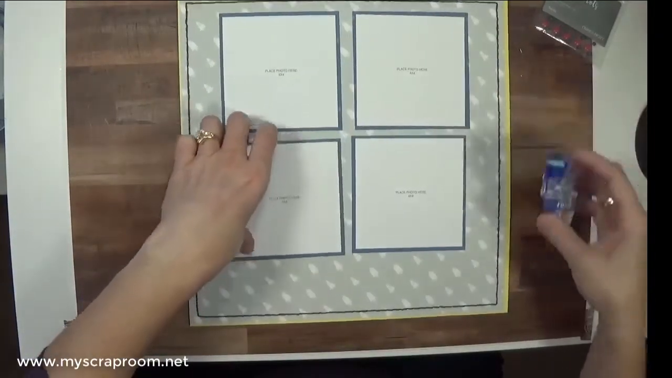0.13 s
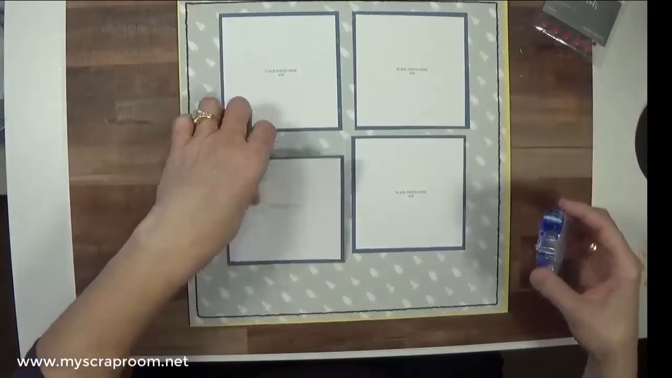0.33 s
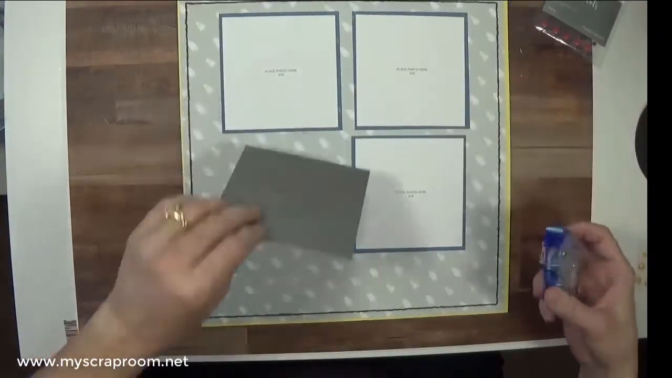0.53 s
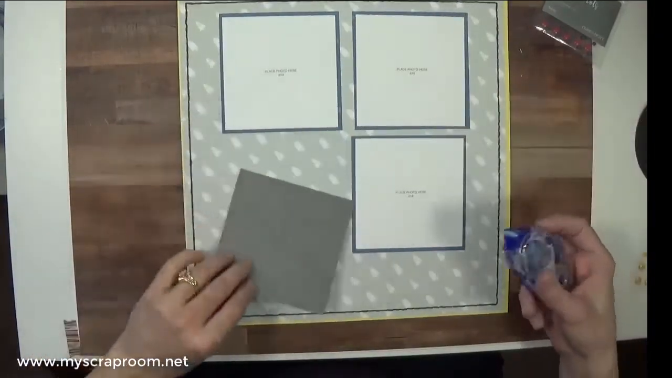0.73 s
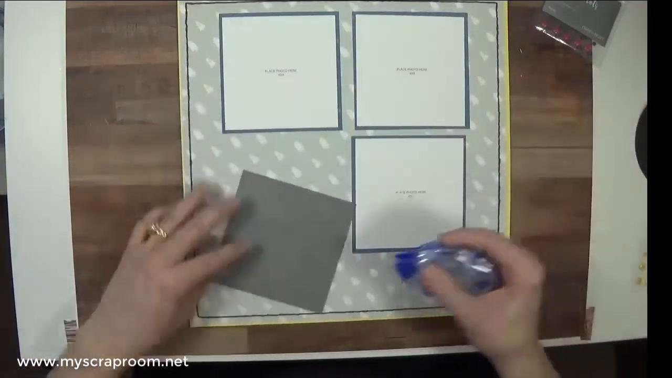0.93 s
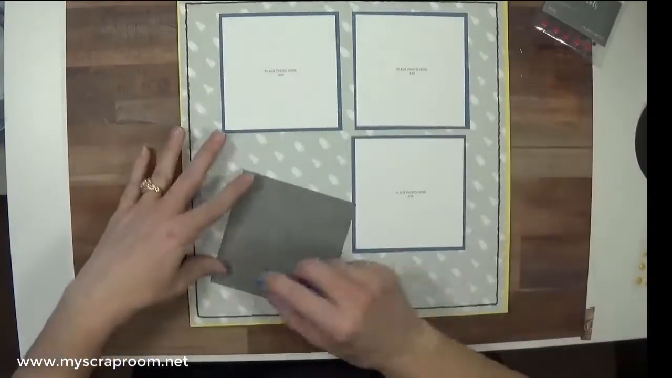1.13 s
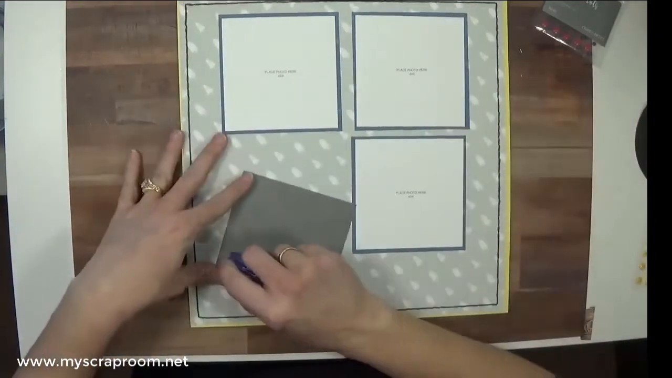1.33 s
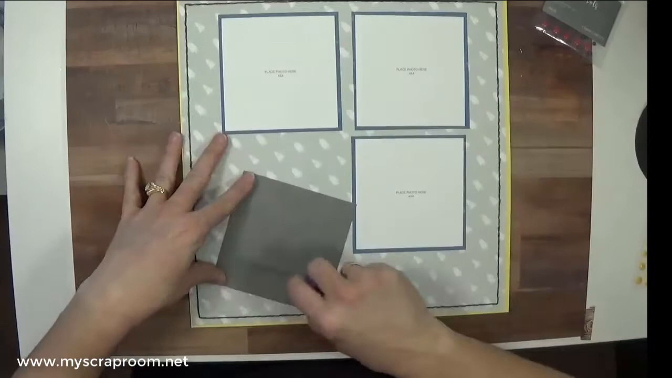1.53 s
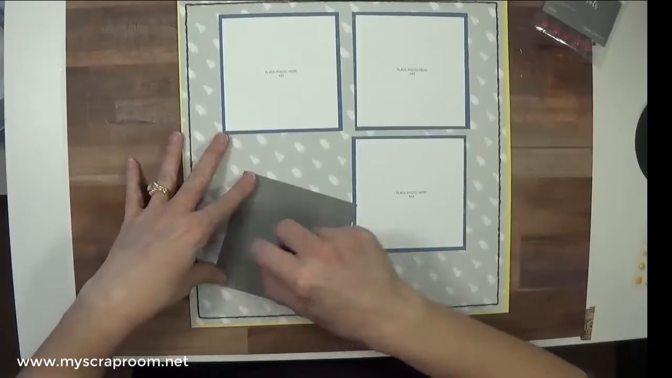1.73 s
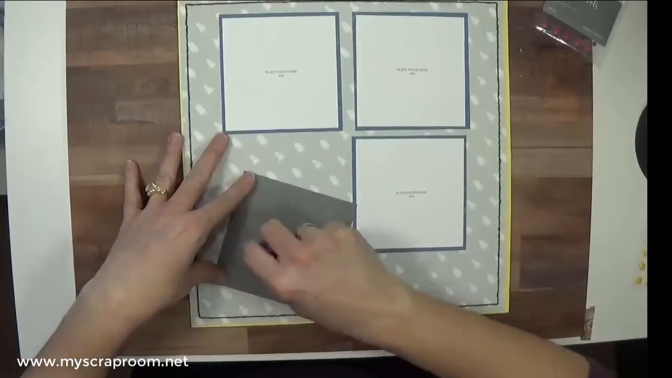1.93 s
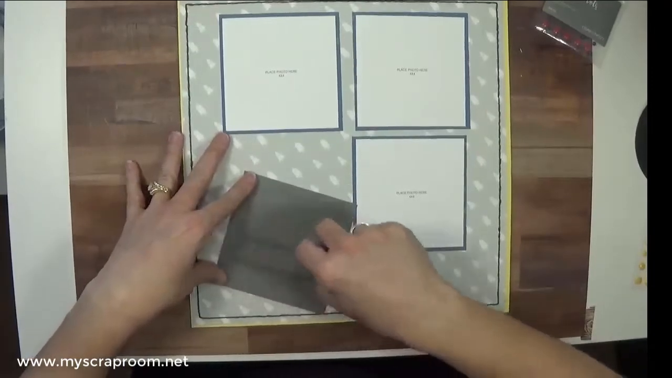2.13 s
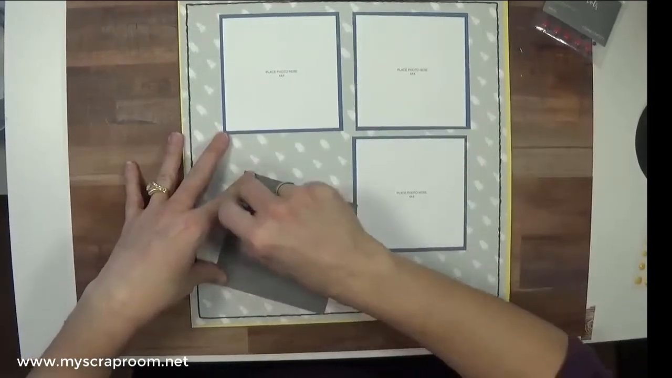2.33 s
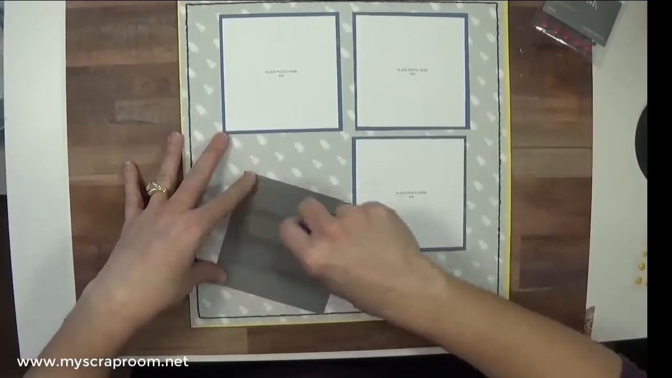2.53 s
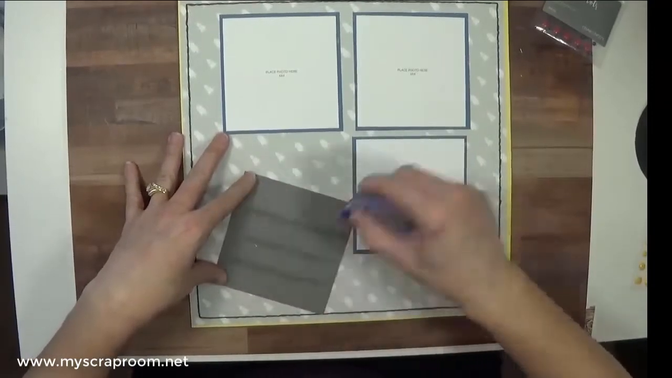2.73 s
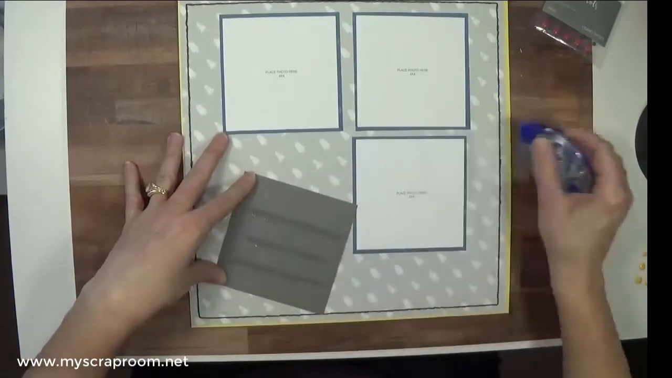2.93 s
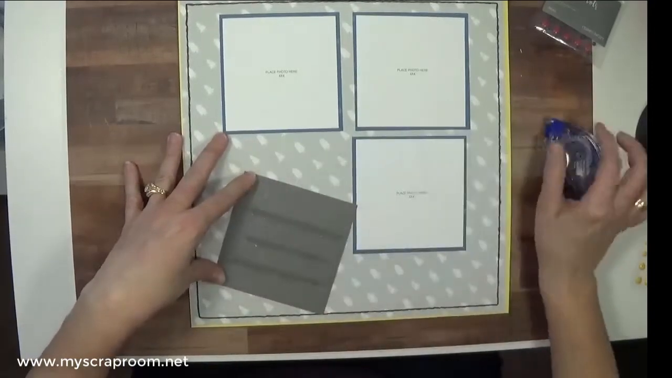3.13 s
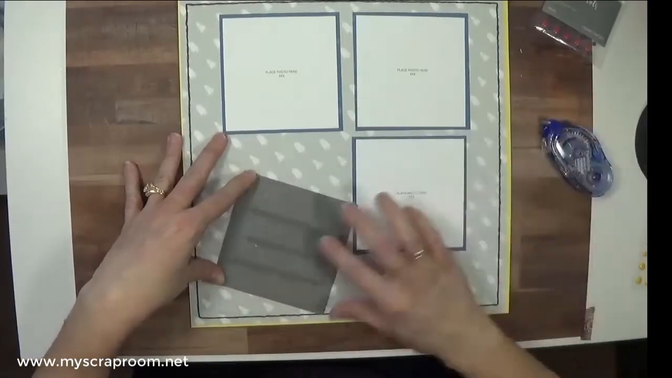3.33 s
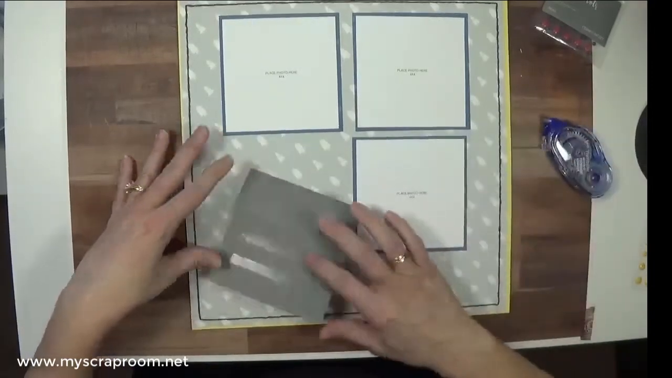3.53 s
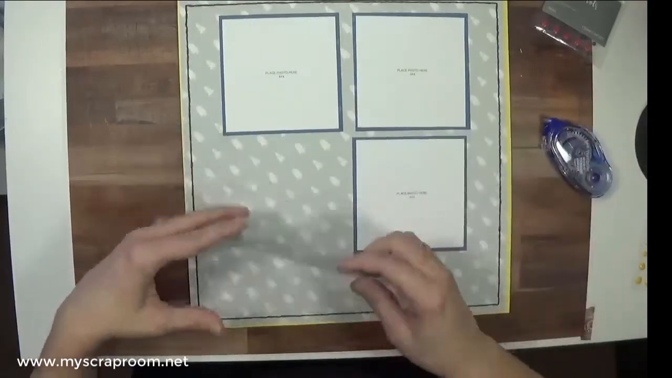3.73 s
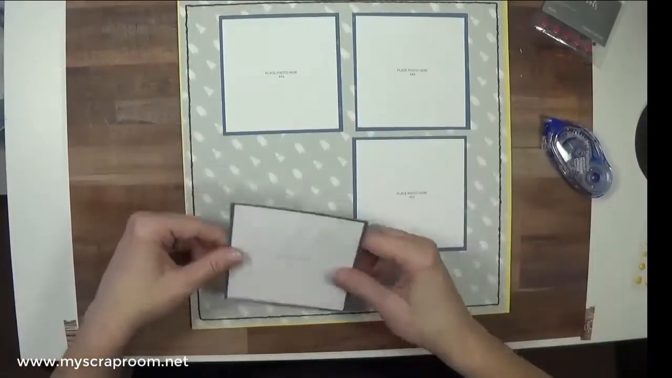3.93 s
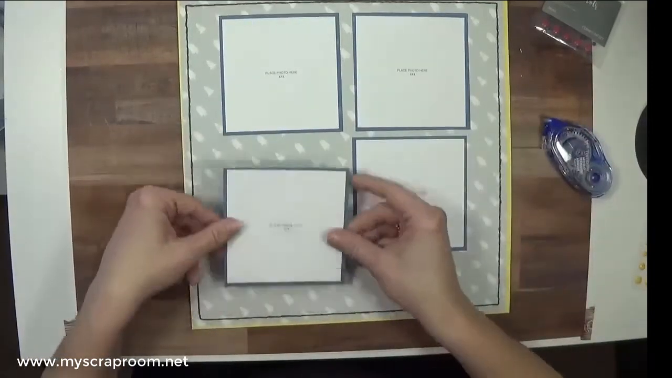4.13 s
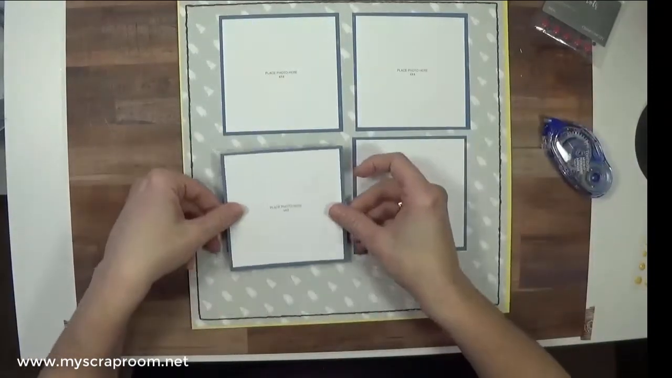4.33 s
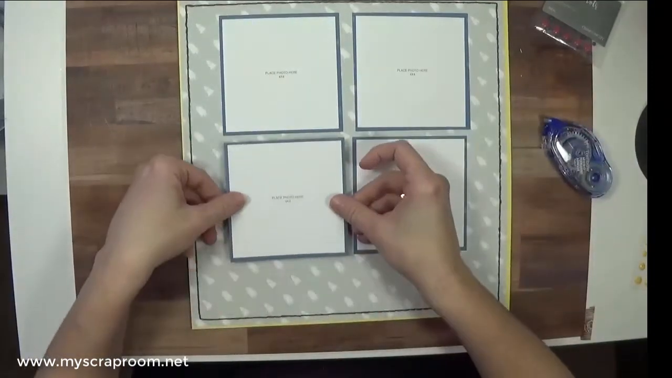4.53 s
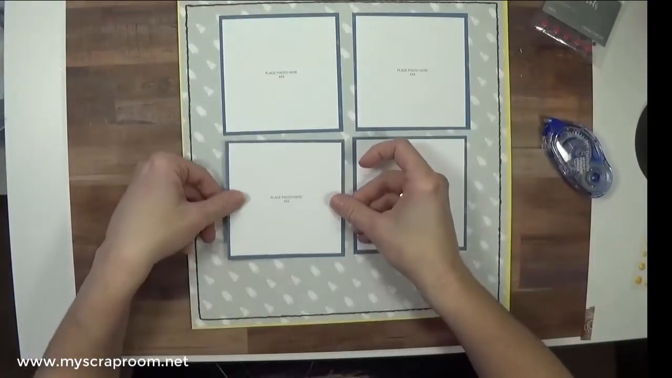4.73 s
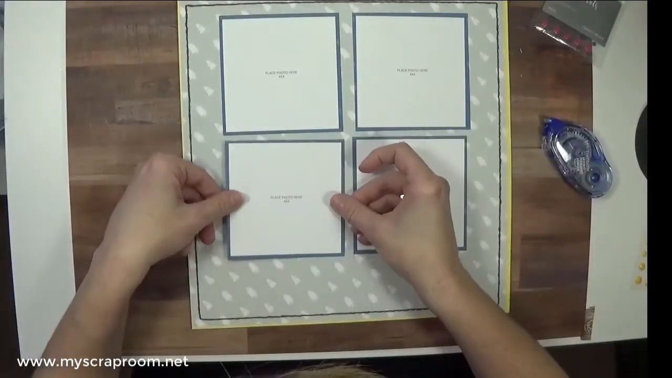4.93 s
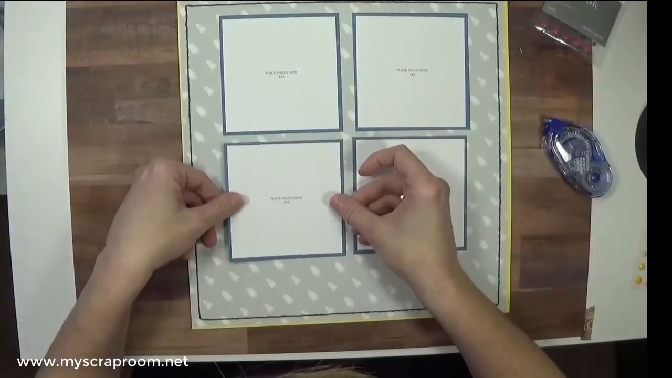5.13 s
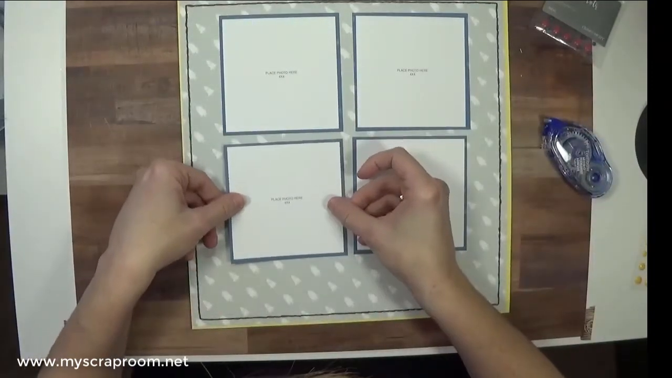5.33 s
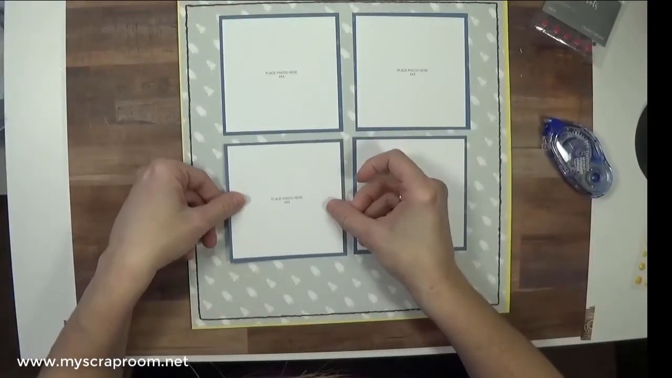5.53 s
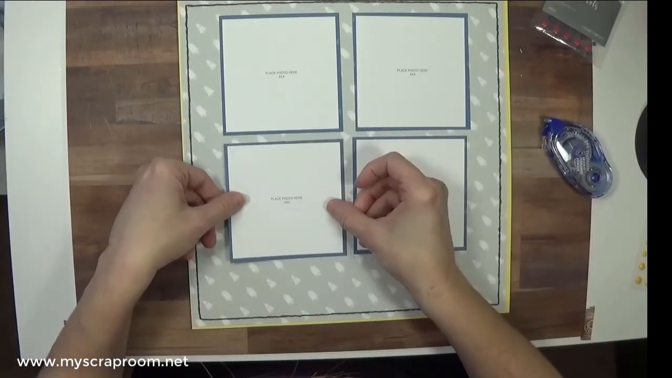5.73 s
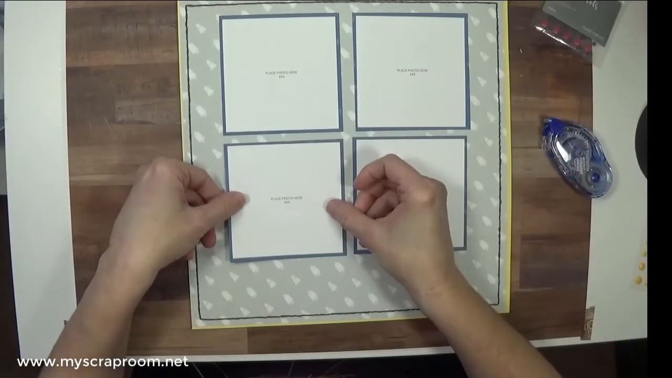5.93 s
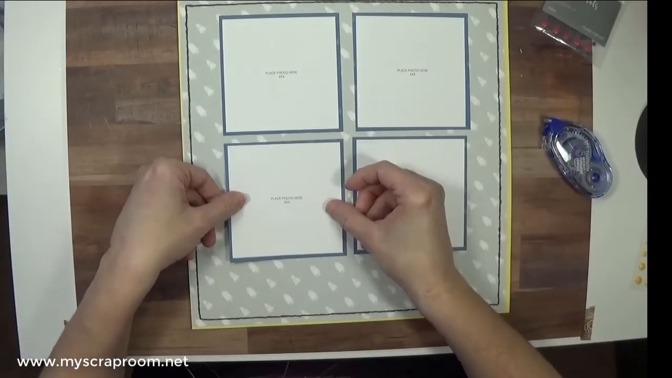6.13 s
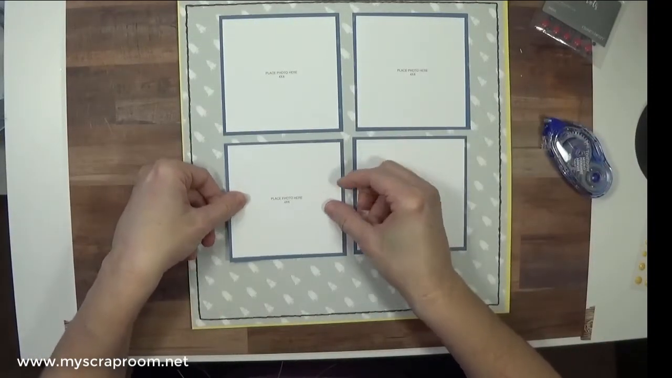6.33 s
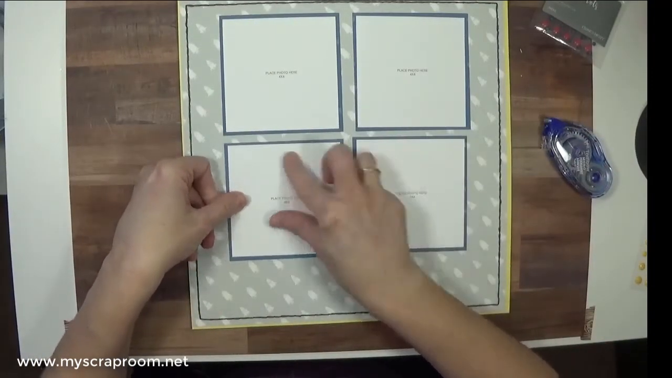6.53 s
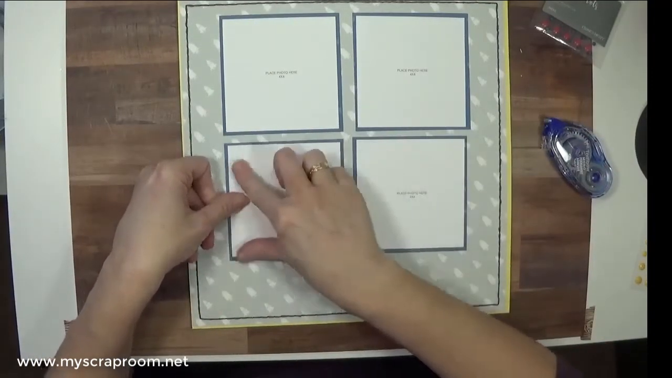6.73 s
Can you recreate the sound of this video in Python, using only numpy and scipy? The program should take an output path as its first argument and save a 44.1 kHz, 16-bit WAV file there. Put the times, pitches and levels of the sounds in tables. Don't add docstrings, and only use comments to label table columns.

```python
import sys
import numpy as np
from scipy import signal
from scipy.fft import rfft, irfft, next_fast_len
from scipy.io import wavfile
from scipy.ndimage import uniform_filter1d

SR = 44100
rng = np.random.default_rng(int(sys.argv[2]) if len(sys.argv) > 2 else 0)


def decibels_to_gain(level_db):
    exponent = np.asarray(level_db, float) / 20
    return 10 ** exponent


def unload_audio(sound):
    columns = np.transpose(np.atleast_2d(sound))
    steps = np.round(np.clip(columns, -1, 1) * 32767)
    wavfile.write(sys.argv[1], SR, steps.astype(np.int16))


N = 302967
TIME_S = np.arange(N) / SR

# mode_hz, width_hz, level_db
SHELL_MODES = [(1100, 220, -3.5), (1580, 220, 0.8), (1900, 200, -2), (2560, 250, -3), (2950, 300, -7),
               (4230, 300, -0.6), (5150, 400, -6), (6580, 350, -5), (8450, 450, -6)]
BODY_MODE, FREE_MODE, UPPER_MODE = 1, 5, 7


def pulls():
    # start_s, length_s, rasp_db, grip_s (time to take a firm grip)
    pull_rows = [
        (1.371, 0.27, -30, 0.02),
        (1.871, 0.27, -29.5, 0.0078),
        (2.384, 0.3, -28.5, 0.014),
    ]
    # time_s, teeth_passed (count)
    drawn_rows = [
        [(1.3824, 0), (1.3945, 1), (1.4147, 3), (1.4443, 7), (1.493, 16), (1.5302, 22), (1.5448, 24),
         (1.5791, 28), (1.6037, 30)],
        [(1.8808, 0), (1.888, 1), (1.9214, 4), (1.9479, 9), (2.0121, 21), (2.0529, 28), (2.0638, 29),
         (2.0717, 30), (2.0945, 32)],
        [(2.3909, 0), (2.4013, 1), (2.4287, 3), (2.4437, 5), (2.5251, 19), (2.577, 27), (2.5954, 30),
         (2.6262, 33), (2.649, 34)],
    ]
    shapes = [pull_shape(*row) for row in pull_rows]
    moving = gains(shapes, lambda r: 0 * r[:, 1]) > 0.5
    teeth = ratchet(drawn_rows)
    glue = peel(drawn_rows, moving)

    span = slice(int(1.3 * SR), int(1.3 * SR) + 65536)
    grip_db = hand_grip(span)
    low, high = np.zeros((2, N))
    low[span] = band(shell((teeth + glue)[span], grip_db, wash_db=-2), 500, 3300)
    high[span] = -band(shell((teeth + decibels_to_gain(-4) * glue)[span], grip_db, wash_db=1), 3300, 15000)
    low = low / np.std(low[moving])
    high = high / np.std(high[moving])
    rasp = low * gains(shapes, lambda r: r[:, 1]) + high * gains(shapes, lambda r: r[:, 2])
    drum = level(signal.fftconvolve(rng.standard_normal(N), thud(0))[:N])
    return np.array([rasp, drum * gains(shapes, lambda r: r[:, 3])])


def pull_shape(start_s, length_s, rasp_db, grip_s):
    slow_treble_db, fast_treble_db = 0.5, 6
    start_rumble_db, end_rumble_db = -19, -14.5
    effort_db, grip_db, lift_db, lift_s = 0.2, -10.5, -22.5, 0.039
    u = np.linspace(0, 1, num=60)
    effort = np.sin(np.pi * u) ** 2
    gripping = np.clip(1 - u * length_s / grip_s, 0, 1)
    lifting = np.clip(1 - (1 - u) * length_s / lift_s, 0, 1)
    rasp = rasp_db + effort_db * (effort - 1) + grip_db * gripping + lift_db * lifting
    treble = rasp + slow_treble_db + (fast_treble_db - slow_treble_db) * np.sqrt(effort)
    rumble = rasp + start_rumble_db + (end_rumble_db - start_rumble_db) * u
    return np.transpose([start_s + u * length_s, rasp, treble, rumble])


def ratchet(drawn_rows, jitter_ms=0.3, tooth_ms=1.35, scatter_db=2.5):
    tooth_s = []
    for rows in drawn_rows:
        when, count = np.transpose(rows)
        tooth_s.append(np.interp(np.arange(rows[-1][1] + 1), count, when))
    tooth_s = np.concatenate(tooth_s)
    jitter, strength = rng.standard_normal((2, len(tooth_s)))
    slaps = np.zeros(N)
    at = ((tooth_s + (jitter_ms * jitter - tooth_ms) / 1000) * SR).astype(int)
    slaps[at] = decibels_to_gain(scatter_db * strength)
    return level(np.abs(signal.fftconvolve(slaps, contact(np.ones(1000), tooth_ms))[:N]))


def peel(drawn_rows, moving, grain=1.2):
    slow_teeth = 70
    drawn = sum(np.interp(TIME_S, *np.transpose(rows)) for rows in drawn_rows)
    speed = np.maximum(uniform_filter1d(np.gradient(drawn) * SR, size=900), slow_teeth)
    return level(moving * decibels_to_gain(grain * walk(640)) * (speed / slow_teeth) ** 0.8)


def hand_grip(span):
    # time_s, balance_db (given to the lower mode, taken from the upper)
    thumb_rows = [(1.38, 6), (1.445, 5), (1.48, -3), (1.575, -5), (1.6, 4), (1.9, 4), (1.99, 3), (2.04, 1),
                  (2.1, 4), (2.42, 2), (2.47, -1), (2.52, 1), (2.58, -2), (2.66, 2)]
    grip_db = [2.4 * walk(14)[span] for _ in SHELL_MODES]
    thumb_db = np.interp(TIME_S[span], *np.transpose(thumb_rows))
    grip_db[FREE_MODE] = grip_db[FREE_MODE] / 2 + thumb_db
    grip_db[UPPER_MODE] = grip_db[UPPER_MODE] / 2 - thumb_db / 2
    grip_db[BODY_MODE] = grip_db[BODY_MODE] / 2 + 1
    return grip_db


def shell(force, grip_db, wash_db):
    # freq_hz, density_db (per Hz)
    wash_rows = [(300, -44.5), (700, -19), (1000, -7), (1700, -1), (2300, -2), (3500, -0.5), (5500, -4),
                 (8000, 0), (11000, -3.5)]
    noise = force * rng.standard_normal((len(SHELL_MODES) + 1, len(force)))
    modes = 0
    for k, (hz, width_hz, db) in enumerate(SHELL_MODES):
        modes = modes + decibels_to_gain(db + grip_db[k]) * resonate(noise[k], hz, width_hz)
    return level(band(modes, 710, 15000, order=3)) + level(colour(noise[-1], wash_rows), wash_db)


def knocks(contact_ms=1.3, thud_db=-3, wash_db=-2.5):
    # time_s, peak_db, treble_db (re peak)
    slap_rows = [(1.3815, -11.5, 3), (1.3949, -15, -2.5), (1.4055, -15.5, -8), (1.4166, -12.5, -4),
                 (1.493, -15.5, 6), (1.518, -16.5, 7), (1.524, -20.5, 7.5), (1.5544, -17, 8.5),
                 (1.6041, -17, 3), (1.8884, -13, -7.5), (1.9007, -18, 4.5), (1.9473, -13.5, 1),
                 (2.029, -16.5, 4.5), (2.0814, -8.5, -2), (2.0945, -14, 7), (2.395, -9, -12.5),
                 (2.405, -10, -11), (2.4147, -17, 6), (2.4296, -19, 2.5), (2.5506, -11.5, 1),
                 (2.576, -15, -0.5), (2.6251, -16.5, 1), (2.6485, -18, 0), (2.652, -18.5, 3.5),
                 (1.8763, -23.5, -1.5), (1.909, -16, 0), (1.4882, -14.5, 0.5), (1.504, -14, 1),
                 (2.5021, -16.5, -2.5), (2.5143, -15, 3)]
    # time_s, peak_db, treble_db (re peak), thud_db
    landing_rows = [(0.064, -53, -5, 13.5), (1.3029, -26.5, -8.5, 2.5), (1.309, -24.5, 0.5, -11),
                    (1.3108, -19.5, -1.5, -9), (1.3283, -21.5, -18, -8), (1.358, -28, -3, -16),
                    (1.363, -26.5, -11, -20), (1.8193, -5.5, -7.5, -7.5), (1.8268, -9, -2.5, -16.5),
                    (1.83, -9.5, 2.5, -9.5), (2.222, -38.5, 3, -22), (2.319, -33, -22, -10),
                    (2.3236, -16.5, -6, 1.5), (2.332, -3.5, -4, -19), (2.3341, -7.5, -5, -28.5),
                    (2.338, -9.5, -3.5, -23)]
    # time_s, peak_db, treble_db (re peak), thud_db (re peak)
    rattle_rows = [(3.002, -10, 0.5, -18.5), (3.0054, -13, 0, -24), (3.0945, -8, 2, -16.5),
                   (3.0984, -6.5, -10, -16.5), (3.1025, -7.5, -7.5, -27), (3.1099, -4, -6.5, -22.5),
                   (3.1165, -0.5, -11.5, -28), (3.1242, -21, -17, -22), (3.013, -25, 2, -28),
                   (3.029, -25, -14, -13), (3.131, -21, -9, -14), (3.14, -28, -8, -20),
                   (3.147, -24, -1, -15.5), (3.179, -27, -6, -3), (3.19, -29, -4, -4),
                   (3.2155, -34, -1, -15), (3.2247, -21, -5, -24), (3.2334, -21, -4, -29),
                   (3.241, -31, 0, -8), (3.266, -30, -9, -11), (3.306, -39, -13, -8), (3.33, -40, -18, -7),
                   (3.392, -31, -5, -13), (3.1545, -21.5, -6, -5), (3.1639, -11.5, 1.5, -15),
                   (3.1702, -24, 4, -5), (3.2193, -25, -5, -15), (3.229, -12, -20, -19),
                   (3.236, -26, -2, -39), (3.2558, -24, -9, -14), (3.26, -16.5, -9.5, -16),
                   (3.2986, -28.5, -8, -7), (3.3163, -24.5, -5.5, -14), (3.323, -29.5, -11, -8.5),
                   (3.3705, -32, -6, -9), (3.3862, -32, 6.5, -27), (3.4051, -33.5, 3, -5.5)]
    let_go_s, free_ring_db = 3.2, 10
    inside = [(*row, -99) for row in slap_rows]
    out = np.zeros((2, N))
    for s, db, treble_db, desk_db in inside + landing_rows + rattle_rows:
        mix_db = 3 * rng.standard_normal(len(SHELL_MODES))
        mix_db[FREE_MODE] += free_ring_db * (s > let_go_s)
        ms = contact_ms * decibels_to_gain(3 * rng.standard_normal())
        sound = shell(np.roll(contact(np.ones(2048), ms), 50), mix_db, wash_db)
        top_hz = 16000 / np.clip(ms, 1, 2.6)
        add(out[0], s, band(sound, 660, 3300), db - 6.5)
        add(out[0], s, -band(sound, 3300, top_hz), db + treble_db)
        add(out[1], s + 0.0008, thud(s), db + desk_db + thud_db)
    return out


def thud(s, push_ms=0.59, set_down_s=2.9):
    # mode_hz, level_db, t60_s
    mat_rows = [(62.3, -10.5, 0.11), (130, -19, 0.023), (220, 5.5, 0.035), (257, 11, 0.069),
                (257, -17.5, 0.13)]
    # mode_hz, level_db, t60_s
    wood_rows = [(98, -18.5, .1), (196, -6, 0.35), (254, 4, 0.043), (301.2, 9, 0.11), (534, -5, 0.12),
                 (624, -1, 0.07), (810, -8.5, 0.082)]
    modes = ring(*np.transpose(mat_rows if s < set_down_s else wood_rows), size=12000)
    return signal.fftconvolve(modes, np.hanning(int(push_ms * SR / 1000)))


def ticks(cycles=12, crack_db=-4, thud_db=-6):
    # time_s, peak_db, ring_hz,
    # treble_db (re peak)
    tick_rows = [(0.0359, -38.5, 1480, 9), (0.2723, -29, 4370, 1), (0.2744, -42, 1600, -9),
                 (.279, -37.5, 1090, -19), (0.536, -33.5, 1540, -27), (0.5738, -23, 1640, -31),
                 (0.5734, -17, 4250, -30), (.578, -26, 1580, -14), (0.5821, -26, 1540, -22),
                 (.592, -40, 1410, -20), (0.602, -40, 1580, -20), (.613, -42, 1590, -20),
                 (.46, -36, 1890, 3), (0.674, -45, 820, 10), (0.7039, -25.5, 2210, -5),
                 (0.7624, -27, 4030, 10), (0.769, -28.5, 2480, 2), (0.9136, -34.5, 1680, -12),
                 (0.9388, -36, 4600, 2), (0.9454, -38.5, 1510, -2), (0.9693, -44, 1670, -11),
                 (1.1942, -40, 1100, 11), (1.6542, -22, 9000, -3), (1.6634, -16, 8000, -2),
                 (1.668, -28, 4110, -4), (1.717, -36, 6000, -2), (2.158, -19.5, 5860, 2.5),
                 (2.1613, -23, 6980, -2.5), (2.6984, -36, 6000, -2), (2.7029, -22, 6500, -2),
                 (2.71, -32, 6000, -5), (2.7823, -44, 1710, 10), (2.8002, -39, 1595, -7),
                 (2.8678, -35.5, 1777, -19),
                 (3.523, -35.5, 2660, 5), (3.5688, -46.5, 1010, -3), (3.3685, -27.5, 3100, -8),
                  (3.6225, -47, 3000, 7), (3.6274, -43, 864, 5), (3.636, -45, 1296, 4),
                  (3.645, -46, 850, -12), (3.87, -50, 1000, 7), (3.9, -39, 1390, -5),
                  (3.921, -32, 1010, -7), (3.99, -43, 1380, -9), (4.022, -38.5, 1470, 1),
                  (4.035, -44, 1490, 2), (4.046, -49, 960, -9), (3.6758, -49, 1630, 6),
                  (3.751, -43.5, 884, 4), (3.9058, -31.5, 1490, 2), (3.9106, -19.5, 2940, -4),
                  (3.9148, -22, 1060, 11), (3.9517, -28, 1060, 7), (4.3177, -34.5, 2261, -2),
                  (4.3215, -32, 4360, -13), (4.324, -37, 2400, -5), (4.489, -46.5, 1000, -23),
                  (4.4925, -43.5, 698, -25), (4.52, -52, 603.8, -25), (4.6, -52, 2300, -11),
                  (4.644, -40, 3000, -11), (4.651, -40, 3280, -4), (4.657, -22, 3520, -2),
                  (4.66, -45, 790, -11), (4.682, -40, 3500, -9), (4.6865, -52, 2400, -4),
                  (6.371, -38, 5000, -6), (6.3732, -23, 5000, -6), (6.3754, -11, 4940, -19),
                  (6.3765, -1, 4926, -5), (6.3775, -30, 800, -20), (6.3795, -22, 3300, 4),
                  (6.385, -25, 3480, 0), (6.3816, -19, 4500, -14), (6.3967, -39, 3970, 0),
                  (6.4032, -42, 4500, -1), (6.6336, -40, 3500, 4), (6.6419, -25.5, 5037, -9),
                  (6.708, -31, 4940, -11)]
    # time_s, peak_db
    nudge_rows = [(3.449, -44.5), (3.529, -51), (3.629, -56), (3.68, -55), (3.75, -60), (3.916, -46),
                  (3.956, -46), (4.494, -44), (6.385, -39)]
    out = np.zeros((2, N))
    for s, db, hz, treble_db in tick_rows:
        desk_db = -38.5 - 14 * np.log2(hz / 1500)
        touch_ms = 0.9 * decibels_to_gain(-0.33 * (db + 28))
        touch = contact(rng.standard_normal(size=3000), touch_ms)
        touch[0] = 4.4
        ringing = signal.fftconvolve(touch, ring(hz, 0, cycles / hz, size=2000))
        add(out[0], s, band(ringing, hz / 2, 16000), db - 6.5)
        add(out[0], s, band(touch, hz * 0.65, hz * 1.9), db + crack_db)
        add(out[0], s, -band(touch, np.clip(hz * 2, 2800, 5000), 13000), db + treble_db)
        add(out[1], s + 0.0041, thud(0), db + desk_db + thud_db)
    for s, db in nudge_rows:
        add(out[1], s, thud(0), db)
    return out


def slides():
    # freq_hz, density_db (per Hz)
    skin_rows = [(1180, -43), (2000, -17), (2680, -10.5), (4670, 2), (6890, 0.5), (9930, 4), (11300, -5),
                 (11500, -20.5), (15000, -51.5), (22000, -120)]
    # freq_hz, density_db (per Hz)
    card_rows = [(410, -29.5), (700, -3.5), (871, -6.5), (1600, -5.5), (1740, -8.5), (1990, -7), (4000, -6),
                 (5200, -40), (8800, -120)]
    lifted_s = 4.08
    grit = decibels_to_gain(0.9 * walk(35) + 1.0 * walk(150) + 1.9 * walk(900))
    skin = level(colour(grit * rng.standard_normal(N), skin_rows))
    card = colour(grit * rng.standard_normal(N), card_rows)
    flat_hum = resonate(card, 1745, 150.)
    lifted_hum = resonate(card, 2400, 300.)
    card = level(card + np.where(np.arange(N) < lifted_s * SR, flat_hum, lifted_hum))
    return (np.array([skin, card]) * hands()).sum(axis=0)


def hands():
    # start_s, strongest_s, end_s, skin_db, card_db
    stroke_rows = [(.025, 0.072, 0.12, -42.5, -58.5), (.13, 0.212, 0.44, -55.5, -69),
                   (.265, 0.301, 0.35, -43, -53.5), (.32, 0.39, 0.5, -48, -54),
                   (.45, 0.453, 0.74, -68, -56), (.665, 0.675, 0.72, -48, -51.5),
                   (.71, 0.736, 0.84, -45.5, -54), (.84, 0.88, 0.98, -75, -59),
                   (1.01, 1.083, 1.2, -64, -60.5), (1.17, 1.18, 1.26, -57, -59),
                   (1.21, 1.26, 1.35, -53, -58), (1.3, 1.328, 1.38, -52.5, -44.5),
                   (1.62, 1.65, 1.72, -49.5, -60), (1.83, 1.828, 1.91, -48.5, -36.5),
                   (2.11, 2.13, 2.3, -57.5, -53), (2.335, 2.33, 2.3, -56.5, -34),
                   (2.652, 2.66, 2.82, -55.5, -52.5),
                   (3.114, 3.14, 3.21, -37.5, -32.5), (3.21, 3.227, 3.23, -49, -38),
                 (3.293, 3.318, 3.34, -52, -50), (3.365, 3.4, 3.61, -51.5, -59),
                 (3.62, 3.618, 4.4, -76, -70), (3.839, 3.905, 4.13, -55, -55.5),
                 (3.96, 4.02, 4.04, -53, -60), (4.103, 4.204, 4.52, -65, -65), (4.28, 4.31, 4.6, -78, -68),
                 (4.56, 4.6, 4.63, -67.5, -62.5), (4.63, 4.655, 4.7, -62, -62),
                 (4.3, 4.32, 4.31, -54.5, -56), (6.34, 6.385, 6.6, -54.5, -59), (6.423, 6.6, 6.7, -46, -65),
                 (6.628, 6.636, 6.672, -48, -55), (6.688, 6.866, 7.15, -44, -60)]
    # time_s, skin_db
    fidget_rows = [(0, -60.5), (1.0, -65.5), (1.7, -58.5), (2.3, -62.5), (2.9, -65.5), (3.7, -66),
                   (4.5, -77), (5.2, -71.5), (5.5, -78), (6.3, -83), (6.87, -70)]
    edge_db, roundness = -16, 1.85
    fidget_db = np.interp(TIME_S, *np.transpose(fidget_rows))
    card_db = -58.5 + 1.4 * (fidget_db + 58)
    power = decibels_to_gain([fidget_db, card_db]) ** 2
    for start, top, end, *db in stroke_rows:
        span = slice(int(start * SR), int(end * SR))
        away = np.interp(TIME_S[span], [start, top, end], [1, 0, 1])
        power[:, span] += decibels_to_gain(np.array(db)[:, None] + edge_db * away ** roundness) ** 2
    return uniform_filter1d(np.sqrt(power), size=200)


def squeaks(width_hz=170.0):
    # start_s, end_s, pitch_hz, level_db
    squeak_rows = [
        (.2, .27, 3120, -66),
        (.41, 0.597, 1750, -59),
        (.46, 0.645, 3500, -66),
        (.7, .79, 2400, -59),
        (.8, .95, 3550, -68),
    ]
    out = np.zeros(N)
    for start, end, hz, db in squeak_rows:
        noise = rng.standard_normal(SR // 4)[:int((end - start) * SR)]
        tone = resonate(resonate(noise, hz, width_hz), hz, width_hz)
        tone = level(tone, db) * np.sqrt(np.hanning(len(noise)))
        out[int(start * SR):][:len(tone)] += tone
    return out


def room(x, desk, close):
    t60_s, wet_db, early_db, early_ms = 0.24, -10.5, -22, 2.8
    treble_damp = 1.64
    t = np.arange(int(.4 * SR)) / SR
    tail = 1000. ** (-t / t60_s) * np.minimum(t / 0.0013, 1)

    def decay(v):
        v = band(v, 150, 2000) * tail - band(v, 3400, 11000) * tail ** treble_damp
        return v / np.sqrt(np.sum(v ** 2))

    mid, side, near = rng.standard_normal((3, len(t)))
    mid, side = decay(mid), decay(band(side, 330, 6000))
    near = band(near * np.exp(-t * 1000 / early_ms), 900, 9000)
    near = near / np.sqrt(np.sum(near ** 2))
    both = x + desk + decibels_to_gain(-13) * close
    direct = x + close
    wet_mid = signal.fftconvolve(both, decibels_to_gain(wet_db) * mid)[:N]
    wet_side = signal.fftconvolve(both, decibels_to_gain(wet_db - 8.0) * side + decibels_to_gain(early_db) * near)[:N]
    lean = wet_side - decibels_to_gain(-14) * signal.lfilter(*signal.butter(1, 2500, fs=SR), direct)
    desk_pan = decibels_to_gain(np.array([[-2.0], [2.0]]))
    return np.array([direct + wet_mid + lean, direct + wet_mid - lean]) + desk_pan * desk


def air():
    # freq_hz, density_db (per Hz)
    tone_rows = [(15, -50), (25, -17), (38, -9.5), (90, -10.5), (123, -1.5), (163, -9.5), (227, -15),
                 (301, -15), (360, -18), (442, -20), (617, -22), (862, -24), (8030, -32), (10600, -36),
                 (11500, -50), (15000, -86.5), (22000, -120)]
    # freq_hz, side_db (re mid)
    width_rows = [(60, -8.5), (110, -20), (190, -8), (350, -7), (630, -1), (1130, 3), (2030, 0),
                  (3640, -2.5), (6550, -5.5), (11800, -9)]
    # time_s, level_db
    drone_rows = [(0.0, -65), (0.63, -58.5), (0.92, -63), (1.43, -54), (2.51, -58), (2.75, -62),
                  (3.23, -56), (3.4, -64), (4.9, -74), (6.87, -85)]
    mid, side = colour(rng.standard_normal((2, N)), tone_rows)
    scale = decibels_to_gain(-60.5) / np.std(mid)
    side = colour(side, width_rows)
    hum = level(band(rng.standard_normal(N), 120 - 9, 120 + 9), -66.5)
    drone = level(band(rng.standard_normal((2, N)), 360, 600)) * gains([drone_rows], lambda r: r[:, 1])
    return np.array([mid + side, mid - side]) * scale + hum + drone


def contact(noise, ms):
    t = np.arange(len(noise)) / SR * 1000 / np.clip(ms, .2, 12)
    return noise * t * np.exp(-t)


def ring(hz, db, t60, size=6000):
    t = np.arange(size)[:, None] / SR
    decay = 1000. ** (-t / np.maximum(t60, .002))
    return (decibels_to_gain(db) * np.sin(2 * np.pi * hz * t) * decay).sum(axis=1)


def resonate(x, hz, width):
    return signal.lfilter(*signal.iirpeak(hz, hz / width, fs=SR), x)


def band(x, lo_hz, hi_hz, order=2):
    return signal.sosfilt(signal.butter(order, [lo_hz, min(hi_hz, .45 * SR)], "band", fs=SR, output="sos"), x)


def colour(x, points):
    hz, db = np.transpose(points)
    n = next_fast_len(x.shape[-1])
    f = np.maximum(np.fft.rfftfreq(n, 1 / SR), 1)
    gain = decibels_to_gain(np.interp(np.log(f), np.log(hz), db))
    return irfft(rfft(x, n) * gain, n)[..., :x.shape[-1]]


def level(x, db=0):
    return x * decibels_to_gain(db) / np.sqrt(np.mean(x ** 2))


def walk(rate):
    k = int(SR / rate)
    return uniform_filter1d(np.repeat(rng.standard_normal(N // k + 1), k), k)[:N] * 1.1


def gains(tables, column):
    out = np.zeros(N)
    for rows in map(np.array, tables):
        inside = (TIME_S >= rows[0, 0]) & (TIME_S <= rows[-1, 0])
        out[inside] = decibels_to_gain(np.interp(TIME_S[inside], rows[:, 0], column(rows)))
    return uniform_filter1d(out, size=200)


def add(out, s, sound, db):
    top = np.argmax(np.abs(sound))
    i = int(s * SR) - top
    n = min(len(sound), N - i)
    out[i:i + n] += sound[:n] * decibels_to_gain(db) / np.abs(sound[top])


def scene():
    struck, desk = pulls() + knocks()
    close, taps = ticks()
    return room(struck + slides() + squeaks(), desk + taps, close) + air()


def band_limit(x):
    return signal.sosfilt(signal.butter(12, 12370, fs=SR, output="sos"), x)


def record(dry):
    clip_peak = 0.55
    soft = clip_peak * np.tanh(dry / clip_peak)
    soft = signal.lfilter(*signal.butter(1, 40, "high", fs=SR), soft)
    cut = signal.sosfilt(signal.ellip(12, .3, 75, 11050, fs=SR, output="sos"), soft)
    return band_limit(cut)


dry = scene()
out = record(dry)
unload_audio(out)
```